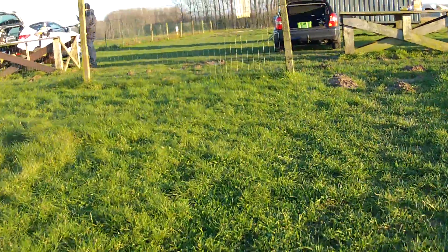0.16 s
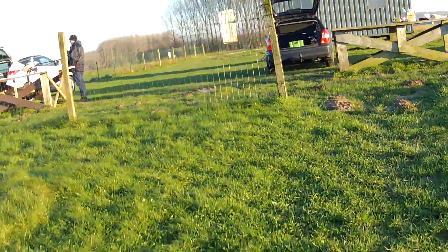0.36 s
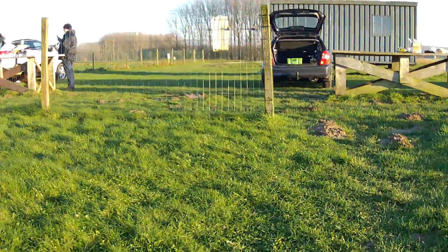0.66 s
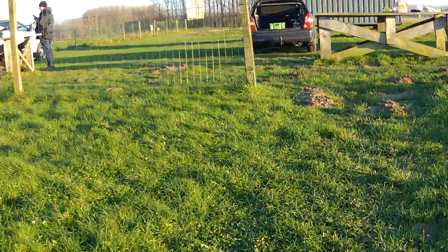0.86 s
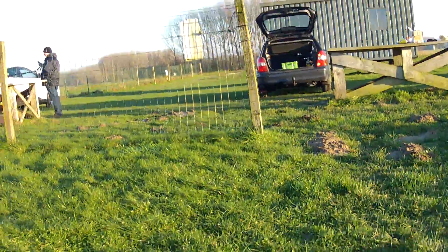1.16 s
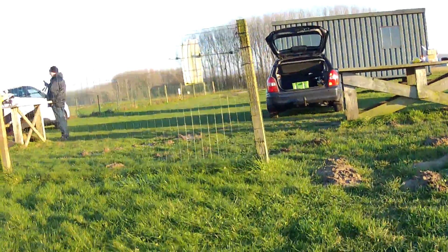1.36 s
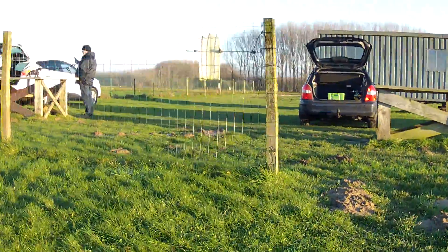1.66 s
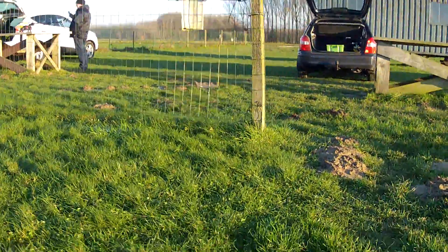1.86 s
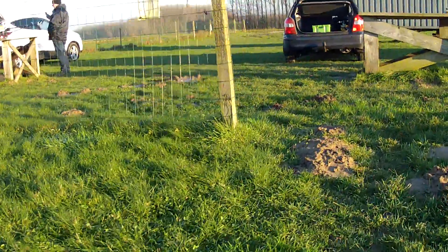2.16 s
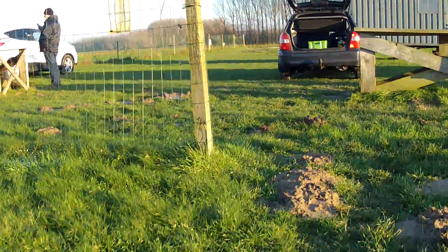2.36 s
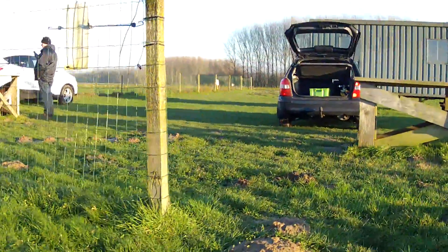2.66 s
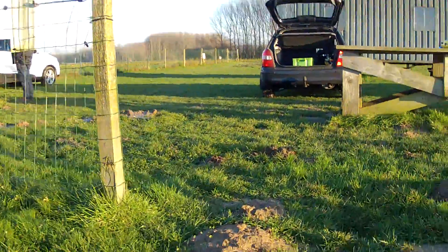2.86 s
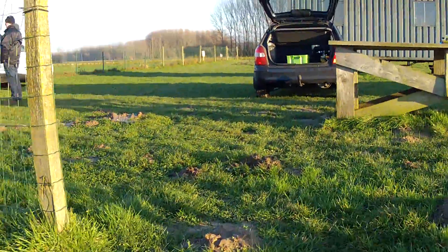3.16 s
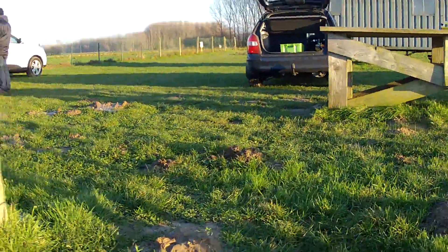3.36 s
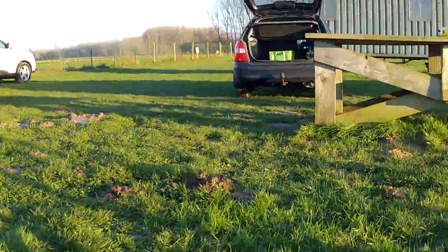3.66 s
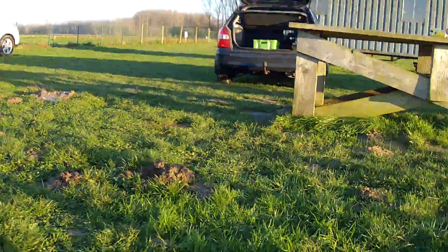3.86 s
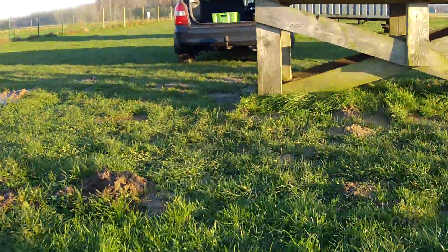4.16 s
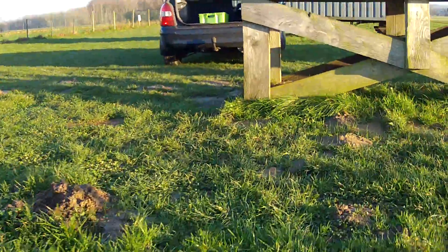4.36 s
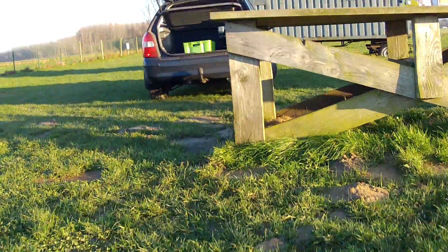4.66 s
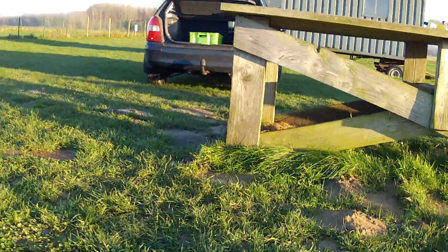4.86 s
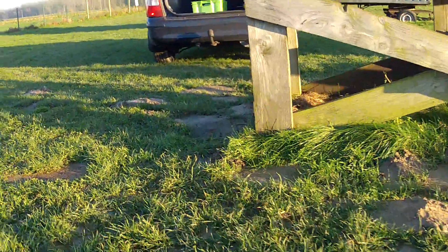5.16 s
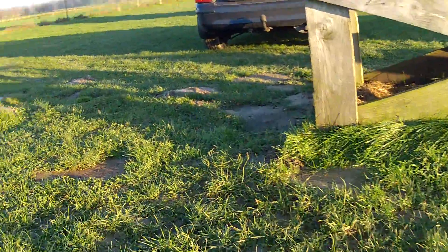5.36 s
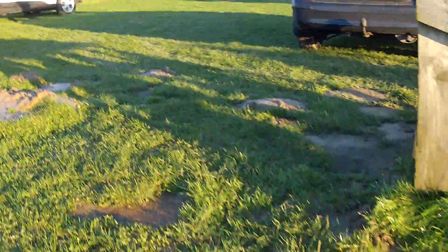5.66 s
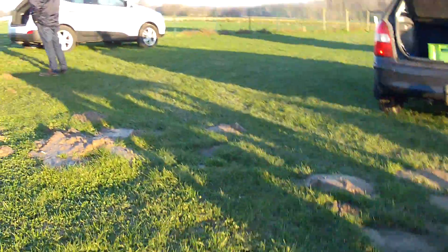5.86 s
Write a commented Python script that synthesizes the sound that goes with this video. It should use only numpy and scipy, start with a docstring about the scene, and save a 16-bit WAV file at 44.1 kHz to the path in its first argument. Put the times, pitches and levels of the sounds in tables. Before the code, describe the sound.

Close, dry, mono sound in an open grassy field: an electric model helicopter flying low, heard through a small, exposed, coarse microphone. From the start a high, buzzy motor whine holds almost one pitch, wavering slightly, with fast rotor flutter and hissy gear noise ringing in the airframe. Beneath it, lumpy low rumble and short wind thumps come irregularly, a heavy one at 1.2 s. A bright tick lands near 1.1 s. From 1.5 to 2.1 s the whine smears and chokes briefly, clears, then roughens again from 2.6 to 3.15 s with quick drop-outs. It is steadier until about 4.6 s, with faint crackles near 3.8 s. The strongest thump hits at 4.7 s as the whine stutters; dense gusts, dull slaps and gaps follow, with a very deep drop-out at 5.8 s before the whine returns strongly. Gritty mirrored treble sits faintly on top throughout.

```python
"""Low over a field, close under an electric model helicopter, with one small exposed microphone.
The drive whines on the orders of one fast shaft, with gear hiss ringing in the airframe.
Turbulent downwash smears, flutters and briefly chokes the whine and buffets the microphone with low thumps;
dull slaps of air and a few bright ticks stand out. Coarse held samples mirror the sound up high."""
import sys
import numpy as np
from scipy import signal
from scipy.fft import rfft, irfft
from scipy.io import wavfile
from scipy.ndimage import uniform_filter1d

SR = 44100
rng = np.random.default_rng(int(sys.argv[2]) if len(sys.argv) > 2 else 0)


def transcribe(u):
    """Save the signal u as a 16-bit wav file named by the first command-line argument.

    u: samples, shape (n,) or (channels, n), limited to [-1, 1]; the rate is SR.
    q: integer samples, one column per channel.
    """
    v = np.clip(np.atleast_2d(u).T, -1, 1)
    q = np.round(v * 32767).astype(np.int16)
    wavfile.write(sys.argv[1], SR, q)


def field_ratio(decibels):
    """Amplitude ratio for a level in dB (20 dB per decade); scalars and array-likes work."""
    return 10 ** (np.asarray(decibels, dtype=float) / 20)


N = 264600


def evened(x):
    """Scales a signal to rms 1."""
    return x / np.sqrt(np.mean(x ** 2) + 1e-20)


def curves(rows):
    """Straight lines through time between rows of (seconds, value, ..), one curve per value."""
    seconds, *columns = np.transpose(rows)
    return [np.interp(np.arange(N) / SR, seconds, column) for column in columns]


def noise(points):
    """Noise of rms 1 whose spectrum follows (Hz, dB) points."""
    point_hz, point_db = np.transpose(points)
    hz = np.fft.rfftfreq(N, 1 / SR)
    gain = field_ratio(np.interp(np.log(hz + 1), np.log(point_hz), point_db, left=-90, right=-90))
    return evened(irfft(gain * rfft(rng.standard_normal(N)), N))


def drift(hz, low_hz=0., step=40):
    """Slow chance of about rms 1: a rounded spectrum hz wide, without what is under low_hz."""
    count = N // step + 2  # drawn at every step-th sample, joined by straight lines
    f = np.fft.rfftfreq(count, step / SR)
    real, imaginary = rng.standard_normal((len(f), 2)).T
    spectrum = (real + 1j * imaginary) / (1 + (f / hz) ** 2) * (f >= low_hz)
    slow = evened(irfft(spectrum, count))
    return np.interp(np.arange(N) / step, np.arange(count), slow)


def wash():
    """Lumpy low rumble, a lighter flapping above it, and the strong gusts as short swings of pressure."""
    # Gusts on the microphone. Each row: centre in seconds, envelope peak in dB, pitch in Hz, length scale in ms.
    thumps = [(0.091, -41, 81, 26), (0.186, -20.5, 98, 5.9), (0.222, -24, 70, 6.2), (0.259, -22, 61, 5.7),
              (0.372, -24.5, 83, 6.2), (0.429, -32, 62, 12), (0.705, -30.5, 59, 18), (0.82, -18.5, 86, 7.9),
              (1.004, -20.5, 91, 5), (1.082, -51, 89, 9.3), (1.15, -30, 77, 8), (1.217, -12.5, 75.7, 10.2),
              (1.373, -19.5, 80, 5.7), (1.419, -22, 86, 5.2), (1.528, -19.5, 77.5, 5.1),
              (1.589, -27.5, 83, 5.3), (1.738, -34, 70, 11), (1.861, -29, 90.5, 2.6), (1.885, -31, 85, 2.1),
              (2.291, -23, 84, 10.3), (2.373, -38, 91, 15), (2.491, -32.5, 86, 17), (2.613, -20.5, 79, 4.3),
              (2.81, -28.5, 89, 11), (2.918, -20, 76, 16.6), (3.356, -19, 84.3, 9.9), (3.412, -30, 94, 32),
              (3.67, -27, 91, 7.6), (3.976, -18, 88, 7.6), (4.033, -22, 65, 9.8), (4.086, -29, 73, 6.9),
              (4.281, -30, 77.5, 7.5), (4.404, -19.5, 81.5, 10.3), (4.459, -22.5, 84, 16),
              (4.631, -27, 76, 9.7), (4.714, -11.5, 82.7, 9.1), (4.757, -28, 76, 9.5),
              (4.798, -27.5, 91, 9.3), (4.922, -27, 71.4, 6.6), (4.978, -28.5, 77, 29),
              (5.035, -19, 91, 5.6), (5.077, -26, 70, 8.4), (5.283, -26.5, 69.5, 20), (5.329, -21, 72, 14),
              (5.397, -20.5, 85, 8), (5.453, -27, 68.4, 14), (5.52, -22, 86, 20), (5.623, -20.5, 68, 17),
              (5.735, -21, 76, 11), (5.766, -27, 73.9, 11.4), (5.821, -30, 88, 7.2), (5.876, -19, 76, 8.5),
              (5.989, -29, 95, 5.6)]
    # Downwash between gusts. Each row: time in seconds, rumble level in dB, flapping level in dB.
    wash_levels = [(0.0, -34.5, -56), (0.23, -45.5, -57.5), (0.6, -48, -58), (0.85, -40.5, -59),
                   (1.27, -43, -57), (2.1, -44.5, -62.5), (2.67, -42.5, -61.5), (3.18, -43, -62.5),
                   (3.54, -40, -55.5), (4.24, -45, -65.5), (4.6, -36, -63), (5.08, -44, -55.5),
                   (5.53, -34.5, -63.5), (6.0, -47, -51)]
    # Spectra of the rumble and of the flapping. Each row: frequency in Hz, relative level in dB per Hz.
    rumble_spectrum = [(15, -42), (28, -16), (42, 3), (60, 2), (85, 0.5), (110, -1.5), (135, -14),
                       (160, -12), (190, -40), (260, -80)]
    flap_spectrum = [(120, -2.5), (165, -10.5), (215, 4), (270, -12.5), (340, -14), (450, -13.5),
                     (600, -24.5), (900, -18.5), (1200, -14)]
    linger = 1.01  # a gust falls this many times slower than it rises
    stir_s, stir_lag_s = 0.032, 0.0071  # each gust stirs rumble and flapping for a while, trailing the gust
    stir_rumble_db, stir_flap_db = -19.5, -39.5  # relative to the gust

    gusts, stir = np.zeros(N), np.zeros(N)
    t = np.arange(-.12, .12, 1 / SR)
    for (s, db, hz, ms), turn in zip(thumps, rng.random(len(thumps))):
        at = np.round((s + t) * SR).astype(int)
        inside = (at >= 0) & (at < N)
        length_ms = np.where(t < 0, ms / linger, ms)
        envelope = np.exp(-.6 * (1000 * t / length_ms) ** 2)
        swing = envelope * np.cos(2 * np.pi * (hz * t + turn))
        gusts[at[inside]] += field_ratio(db) * swing[inside]
        stir[at[inside]] += field_ratio(db) * np.exp(-((t[inside] - stir_lag_s) / stir_s) ** 2)
    rumble_db, flap_db = curves(wash_levels)
    rumble = field_ratio(rumble_db + 4.3 * drift(hz=8.8, low_hz=2.1)) + field_ratio(stir_rumble_db) * stir
    flap = field_ratio(flap_db + 4.15 * drift(hz=19.0, low_hz=5.2)) + field_ratio(stir_flap_db) * stir
    return gusts + rumble * noise(rumble_spectrum) + flap * noise(flap_spectrum)


def pops():
    """Short dull slaps of air on the microphone: shaped noise that swells fast and dies away."""
    # Each row: start in seconds, level in dB of the noise ahead of its rise and decay.
    slaps = [(0.25, -41), (0.798, -54), (0.991, -45), (1.094, -63), (2.047, -47), (2.64, -44.5),
             (3.09, -45), (3.745, -44), (4.431, -52), (4.613, -38.5), (4.669, -36), (4.791, -46),
             (5.02, -43), (5.151, -45), (5.315, -38.5), (5.593, -46), (5.72, -39), (5.803, -34.5),
             (5.85, -39.5), (5.91, -46), (5.955, -34)]
    rise_s, decay_s = 0.0033, 0.0095
    t = np.arange(3000) / SR
    shape = (1 - np.exp(-t / rise_s)) * np.exp(-t / decay_s)
    envelope = np.zeros(N)
    slap = noise([(120, -29), (220, 14.0), (500, -1), (900, -5), (2500, -2), (4000, -35)])
    for s, db in slaps:
        start = round(s * SR)
        envelope[start:][:3000] += field_ratio(db) * shape[:N - start]
    return envelope * slap


def ticks():
    """Bright crackles a few milliseconds long: bursts of band-passed noise."""
    # Each row: start in seconds, peak in dB, pitch region in Hz.
    crackles = [(1.0742, -28, 3030), (3.83, -41, 5000), (3.847, -45, 4600)]
    out, t = np.zeros(N), np.arange(400) / SR
    for s, db, hz in crackles:
        band = signal.butter(1, [.55 * hz, 1.7 * hz], "bandpass", fs=SR)
        burst = signal.lfilter(*band, rng.standard_normal(400))
        burst = burst * (1 - np.exp(-t / .0005)) * np.exp(-t / .002)
        out[round(s * SR):][:400] += field_ratio(db) * burst / abs(burst).max()
    return out


def rough_air():
    """Turbulence through time as the share of smear: calm, with spells that fade in and out."""
    # Each row: start in seconds, end in seconds, share of the whine that is smeared (0-1) ahead of the fades.
    spells = [(.52, .9, .4), (1.52, 2.12, .75), (2.57, 2.8, .65), (2.8, 3.15, .8), (3.82, 3.98, .5),
              (4.66, 4.95, .75), (4.95, 5.37, .5), (5.37, 5.86, .8), (5.86, 6.1, .3)]
    calm, turn_s = .06, .08  # smear in calm air; time the air takes to turn rough
    t, share = np.arange(N) / SR, np.full(N, calm)
    for start, end, strength in spells:
        share[(t >= start) & (t < end)] = strength
    return uniform_filter1d(share, size=round(turn_s * SR))


def shaft_hz():
    """The speed governor hunts about its set point: one cosine swing between each pair of crests."""
    # Each row: crest in seconds, swing to either side in Hz.
    hunt = [(-.05, 1.6), (0.211, 2.8), (.55, 2.7), (.72, 2), (.9, 2.1), (1.06, 2.7), (1.272, 4.8),
            (1.63, 2.45), (1.8, 0.92), (2.0, 1.55), (2.322, 2.2), (2.671, 2.7), (3.04, 1.7), (3.429, 3.1),
            (3.728, 4.5), (3.9, 3.2), (4.1, 1.2), (4.452, 3.6), (4.78, 1.26), (5.0, 1.07), (5.36, 0.53),
            (5.55, 2.1), (5.76, 2.6), (5.94, 1.4), (6.15, 3.4)]
    set_hz = 335.23
    t, (crest, swing_hz) = np.arange(N) / SR, np.transpose(hunt)
    cycles = np.interp(t, crest, np.arange(len(crest)))
    return set_hz + np.interp(t, crest, swing_hz) * np.cos(2 * np.pi * cycles)


def choking():
    """Gain of the whine at the microphone: rotor beat, flutter in rough air, drop-outs that sink and snap back."""
    # The whine drops out for a moment. Each row: time in seconds, depth in dB, width in ms.
    dips = [(0.547, -9, 8.2), (1.617, -8.5, 12), (1.677, -11, 5.9), (1.719, -13, 6.5), (1.791, -14, 5),
            (1.973, -3.5, 40), (2.81, -4.5, 22), (2.936, -15, 8.4), (2.994, -10, 4.7), (3.015, -18, 8.3),
            (3.131, -18, 9), (4.106, -7, 11), (4.662, -24, 3.4), (4.74, -18, 3.7), (4.756, -16, 10.4),
            (4.823, -11, 9), (4.942, -11, 3.9), (5.108, -9, 7.9), (5.366, -11, 7.1), (5.498, -6.5, 16),
            (5.588, -15, 9), (5.642, -14, 8.1), (5.822, -36, 7.8), (5.841, -14, 7)]
    rotor_hz = 31
    rebound, rebound_s = 0.097, 0.01  # then the whine overshoots by this share of the depth, briefly
    turbulence = rough_air()
    t = np.arange(N) / SR
    beat = np.cos(2 * np.pi * rotor_hz * t + 1.7 * drift(hz=1.35))
    shade = np.minimum(drift(hz=58.0, low_hz=24.0), .4)  # eddies take level away, they hardly add any
    db = (1.0 + 0.5 * turbulence) * beat + (1.4 + 2.8 * turbulence) * shade
    for s, depth_db, ms in dips:
        near = slice(max(round((s - .05) * SR), 0), round((s + .05) * SR))
        since = t[near] - s
        db[near] *= 1 - np.exp(-(since / 0.0024) ** 2)  # beat and flutter vanish at the centre
        late = 1000 * since / ms - .3  # in widths from the deepest point
        sink, snap_back = np.exp(-(late / 0.82) ** 4), np.exp(-(late / 0.26) ** 2)
        db[near] += depth_db * np.where(late < 0, sink, snap_back)
        after = np.maximum(since - ms / 2000, 0) / rebound_s
        db[near] -= rebound * depth_db * np.e * after * np.exp(-after)
    return field_ratio(db)


def frame_hiss():
    """Gear noise ringing in the resonances of the airframe, each swelling on its own."""
    # Airframe resonances. Each row: centre in Hz, width in Hz, relative level in dB.
    resonances = [(998, 41, -9.5), (1350, 114, -4), (1685, 810, 4), (1937, 390, 0.5), (2485, 143, -3),
                  (2680, 370, -9), (3003, 69, -7), (3452, 110, -16.5), (3605, 320, -19), (3770, 40, -23),
                  (4066, 47, -17.5), (4330, 160, -23.5), (4640, 170, -30.5), (5030, 180, -25),
                  (5400, 200, -27)]
    hz, out = np.fft.rfftfreq(N, 1 / SR), np.zeros(N)
    white = rfft(rng.standard_normal(N))
    for centre_hz, width_hz, db in resonances:
        ring = irfft(white / (1 + (2 * (hz - centre_hz) / width_hz) ** 2) ** 1.16, N)
        swell_db = 1.5 + centre_hz / 1800
        out += field_ratio(db + swell_db * drift(hz=31.0, low_hz=4.5)) * evened(ring)
    return evened(out)


def whine():
    """Each shaft order is a slowly swelling line plus a smeared band around it, over gear hiss."""
    # How loud the drive whines ahead of the choking. Each row: time in seconds, level in dB.
    drive = [(0.0, -42.5), (0.1, -41), (0.67, -43.5), (1.44, -40.5), (1.54, -47), (1.65, -42), (1.77, -54),
             (1.8, -45), (1.9, -48), (2.19, -41.5), (2.52, -41.5), (2.56, -44), (2.89, -45), (2.99, -48.5),
             (3.27, -40.5), (3.79, -43.5), (4.61, -40), (4.68, -47), (5.18, -43), (5.48, -47.5),
             (5.55, -42), (5.63, -50.5), (5.66, -45.5), (5.82, -49), (5.97, -39.5), (6.0, -43.5)]
    # Each row: multiple of the shaft pitch, relative level in dB.
    orders = [(1, -22.5), (2, -20), (3, -11.5), (4, -0.5), (5, 3), (6, -2.5), (7, -1), (8, -7.5),
              (9, -13.5), (10, -23.5), (11, -21), (12, -22.5), (13, -40), (14, -33), (15, -42), (16, -37.5)]
    # Extra smear of the orders that never sound clean. Each row: multiple of the shaft pitch, share (0-1).
    loose = dict([(3, .55), (6, .85), (9, .35), (10, .8), (11, .45), (12, .4), (13, .8)])
    # Faint wavering tones beside the strong orders. Each row: multiple of the shaft pitch, relative level in dB.
    side_tones = [(4.157, -15), (4.843, -10)]
    jitter_hz = 2.2  # times the turbulence: in rough air the shaft speed also stumbles quickly
    split_hz, upper_db, upper_sway_db = 3230, -13, 2  # the top lies under the whine and sways on its own

    level_db, = curves(drive)
    top_db = upper_db + upper_sway_db * drift(hz=11.5, low_hz=0.99)
    turbulence = rough_air()
    speed_hz = shaft_hz() + jitter_hz * turbulence * drift(hz=8.7, low_hz=2.5)
    turns = np.cumsum(speed_hz) / SR
    tones = np.zeros(N)
    for k, db in orders:
        smear = 1 - (1 - turbulence) * (1 - loose.get(k, 0))
        line = np.sqrt(1 - smear) * field_ratio(1.4 * drift(hz=5.)) * np.exp(2j * np.pi * rng.random())
        band = np.sqrt(smear / 2) * (drift(hz=49.7) + 1j * drift(hz=47.6))
        tones += field_ratio(db) * ((line + band) * np.exp(2j * np.pi * k * turns)).real
    for k, db in side_tones:
        level = field_ratio(db + 2.5 * drift(hz=3.5)) * (1 - turbulence)
        tones += level * np.cos(2 * np.pi * k * turns + 1.5 * drift(hz=6.))
    hiss = field_ratio(-9 + 8 * turbulence) * frame_hiss()  # rough air brings it forward
    mixed = evened(evened(tones) + hiss)
    lower = signal.oaconvolve(mixed, signal.firwin(601, split_hz, fs=SR), "same")
    upper = field_ratio(top_db) * evened(mixed - lower)
    return field_ratio(level_db) * (lower + upper) * choking()


def scene():
    """All sources reach one microphone."""
    return (wash() + pops() + ticks() + whine())[None]


def roll_off(x):
    """The treble ends steeply here."""
    return signal.sosfilt(signal.butter(12, 15390, fs=SR, output="sos"), x)


def record(dry):
    """The microphone loses the deepest bass and hisses; coarse samples, each held, leave mirror images up high."""
    mic_low_hz, mic_hiss_db, hold_hz = 42.6, -66.5, 12000
    heard = signal.sosfilt(signal.butter(3, mic_low_hz, "highpass", fs=SR, output="sos"), dry)
    heard = heard + field_ratio(mic_hiss_db) * noise([(300, 9.5), (4000, -30.5), (5500, 1), (6000, -9.5)])
    heard = signal.sosfilt(signal.butter(4, 5600, fs=SR, output="sos"), heard)
    coarse = signal.resample(heard, N * hold_hz // SR, axis=1)
    stairs = np.repeat(coarse, repeats=4, axis=1)  # each sample held for four steps
    held = signal.resample(stairs, N, axis=1)
    return roll_off(held)


dry = scene()
out = record(dry)
transcribe(out)
```